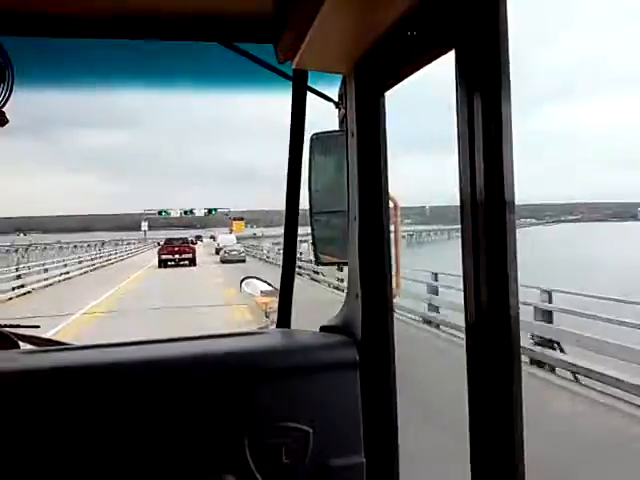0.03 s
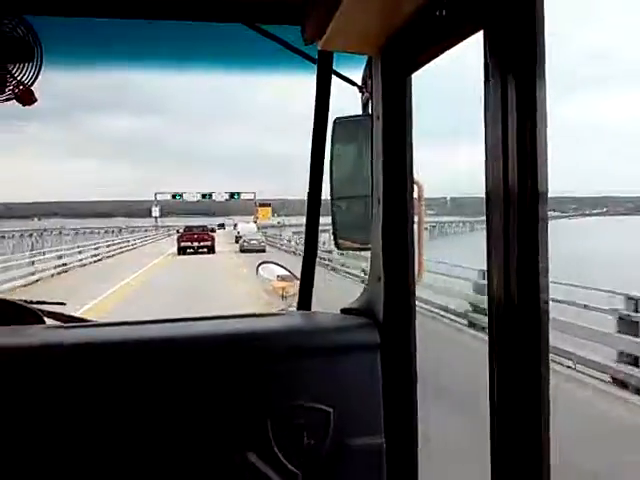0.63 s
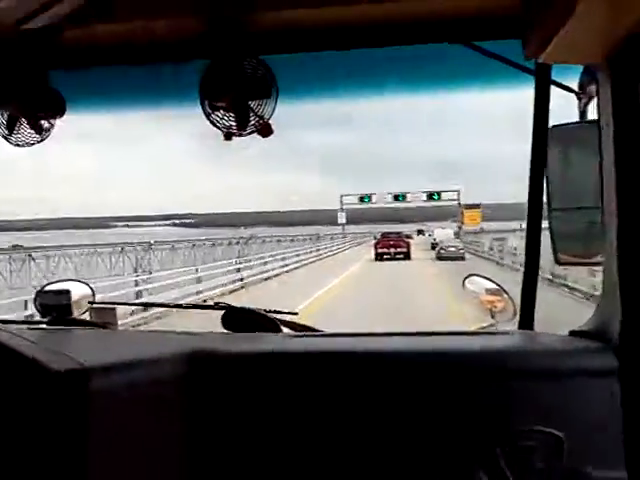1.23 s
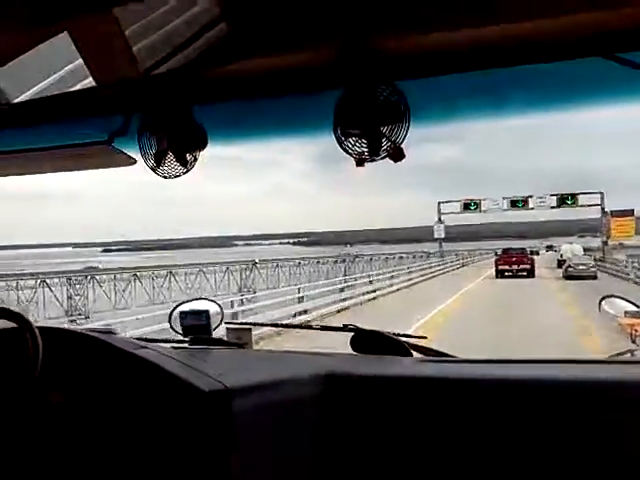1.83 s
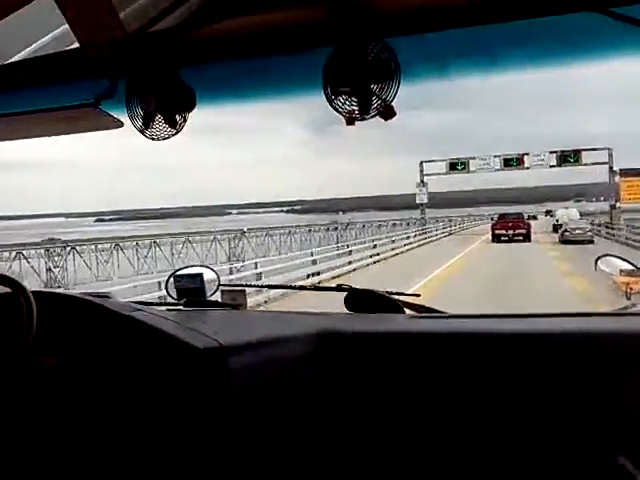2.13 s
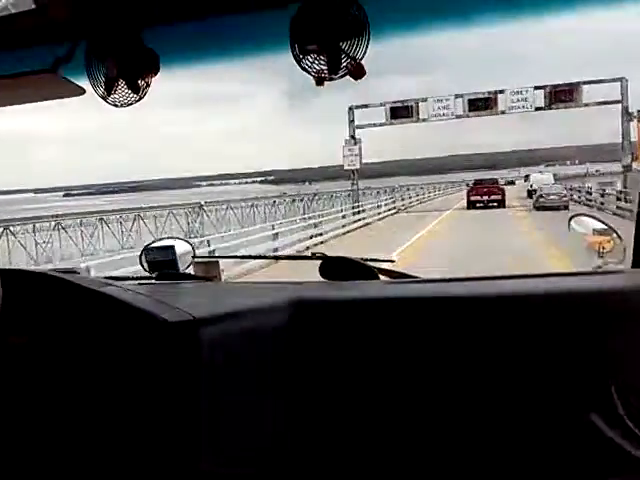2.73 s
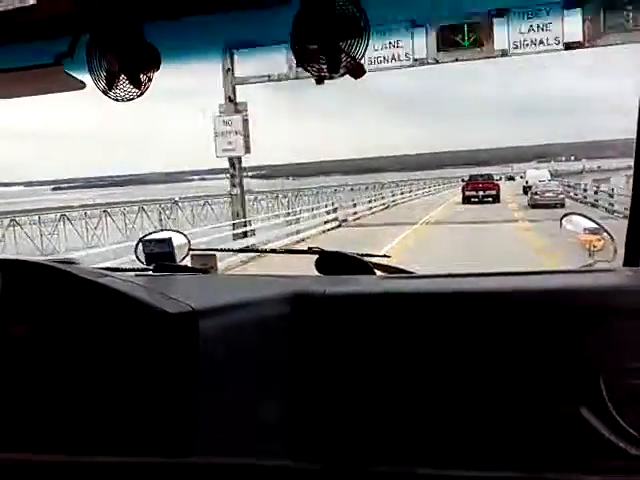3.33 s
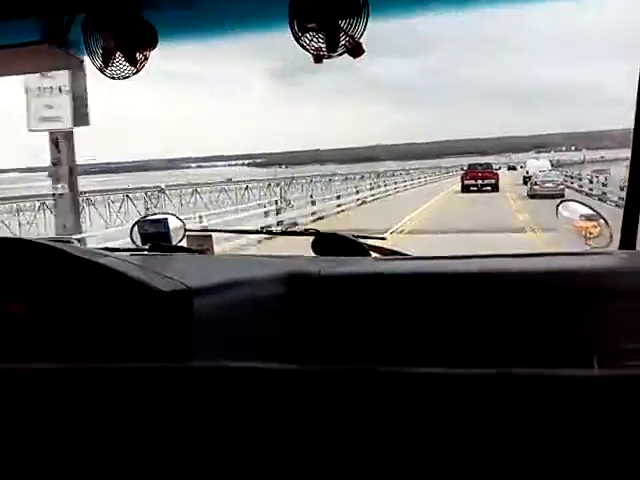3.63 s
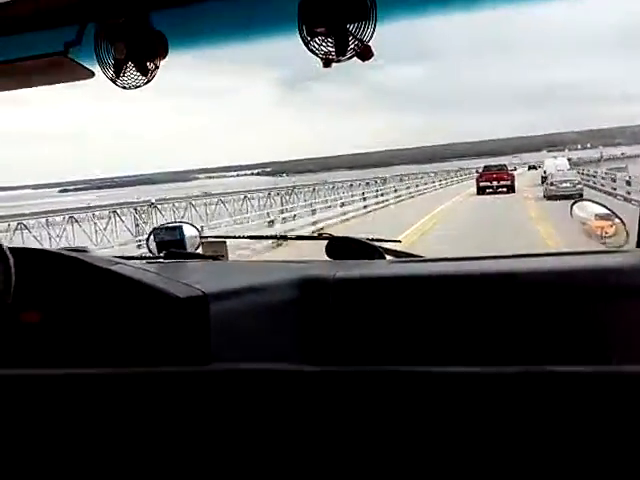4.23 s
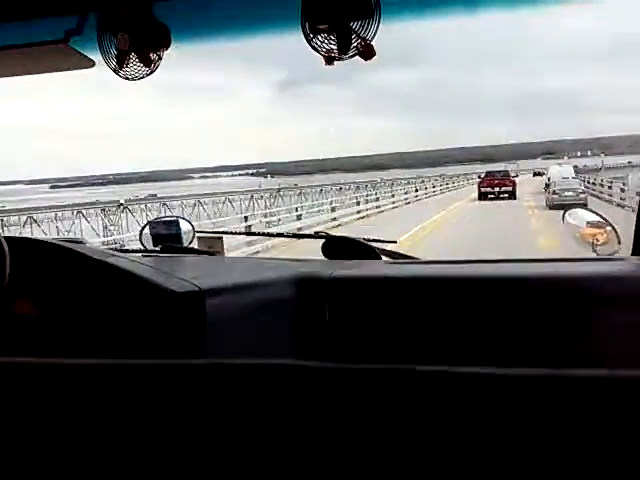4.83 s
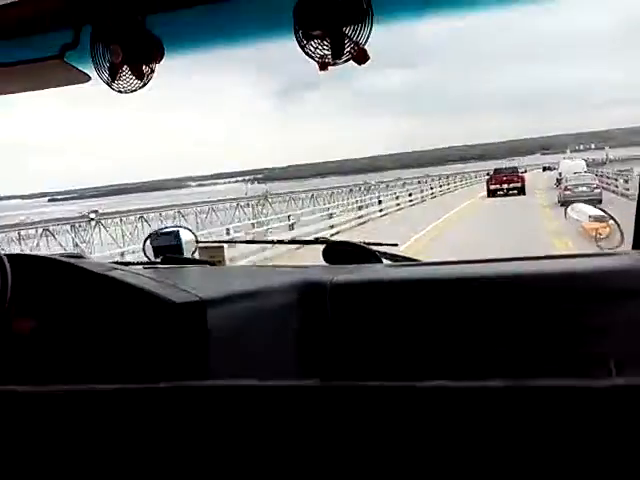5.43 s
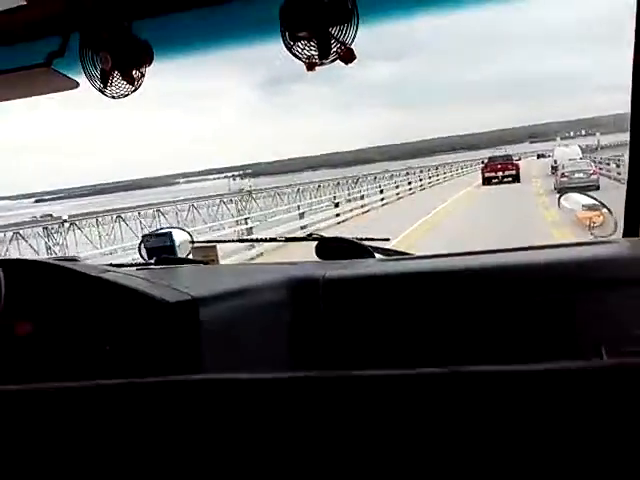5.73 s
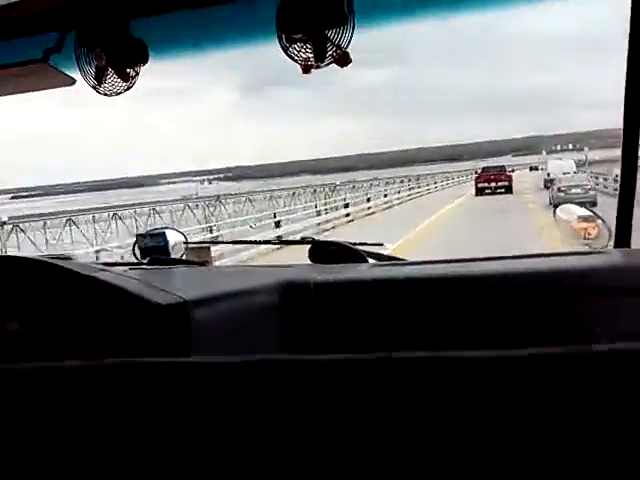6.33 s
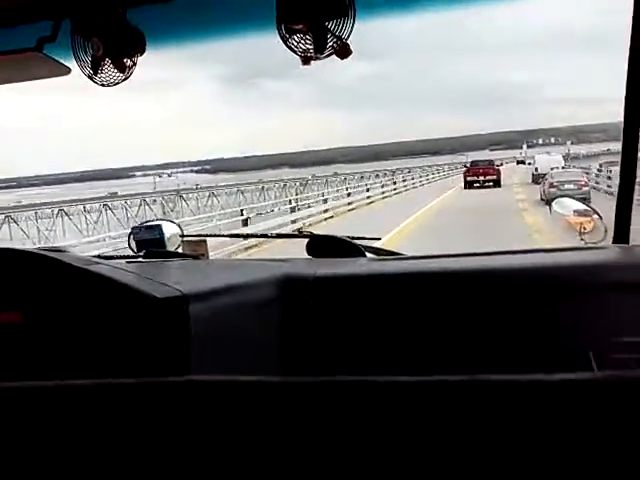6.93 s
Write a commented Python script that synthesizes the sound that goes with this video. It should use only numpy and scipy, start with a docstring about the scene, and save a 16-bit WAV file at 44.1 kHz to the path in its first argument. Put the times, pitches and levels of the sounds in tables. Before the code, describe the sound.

Inside a driving bus, tyres roar and fittings rattle while gusts of wind thump and overload the microphone.

```python
"""The front of a bus driving over a bridge, with wind beating in at a window.
From the start, road roar and a draught fill the cab, with rattling metal, brief squeaks and clacks.
Buffets of air, fierce around 1 s, drive the microphone into saturation: the sound cuts out for
instants, each framed by two low thumps. The wind eases near 2 s, then returns in repeated gusts.
Near 7 s comes a short, bright hiss of air."""
import sys
import numpy as np
from scipy import signal
from scipy.fft import rfft, irfft
from scipy.io import wavfile
from scipy.ndimage import uniform_filter1d

SR = 44100
rng = np.random.default_rng(int(sys.argv[2]) if len(sys.argv) > 2 else 0)


def master(y):
    """Save y as 16-bit WAV."""
    cut = np.clip(np.atleast_2d(y).T, -1, 1)
    pcm = np.round(cut * 32767)  # scale
    wavfile.write(sys.argv[1], SR, pcm.astype(np.int16))


N = 317520
TIME = np.arange(N) / SR
LIMIT = 6.4  # pressure at which the microphone saturates

# Gusts that rock the cabin air: (first crest [s], half swings [count], frequency [Hz],
# share of each half swing at the limit [0-1], first direction [push/pull])
OSCILLATIONS = [(0.19, 2, 27.2, 0.6, "pull"), (0.349, 2, 26.2, 0.7, "push"), (0.793, 2, 36, 0.69, "pull"),
                (0.868, 4, 16.3, 0.72, "push"), (1.072, 3, 12.6, 0.79, "pull"),
                (1.18, 3, 17.7, 0.77, "push"), (2.281, 2, 15.7, 0.4, "push"),
                (2.419, 3, 17.1, 0.42, "pull"), (2.815, 3, 20.5, 0.49, "pull"),
                (3.001, 2, 18.6, 0.44, "push"), (3.142, 2, 20, 0.82, "push"), (3.222, 2, 22, 0.7, "push"),
                (3.289, 2, 24, .48, "push"), (3.412, 2, 25.4, .67, "pull"), (3.492, 2, 18.2, 0.49, "pull"),
                (3.562, 2, 22.8, 0.626, "pull"), (3.689, 3, 25.4, 0.56, "pull"),
                (4.153, 2, 14.8, 0.55, "push"), (4.333, 2, 23.9, 0.57, "push"),
                (4.492, 2, 24.4, 0.69, "pull"), (4.549, 2, 24.3, 0.71, "pull"),
                (4.63, 3, 23.2, 0.77, "pull"), (4.776, 3, 23, 0.76, "push"), (4.859, 2, 17.5, 0.4, "pull"),
                (4.997, 2, 14.8, 0.78, "pull"), (5.218, 3, 11.7, 0.5, "push"),
                (5.448, 2, 24.7, 0.64, "pull"), (5.848, 5, 14.1, 0.74, "pull"),
                (6.149, 2, 16.3, .66, "push"), (6.313, 4, 15.3, 0.71, "push"),
                (6.456, 6, 14.2, 0.78, "push"), (6.758, 4, 18.2, 0.63, "push"),
                (6.904, 2, 12.9, 0.94, "push")]
# Single slaps of wind: (crest [s], time at the limit [s], direction [push/pull])
PULSES = [(.007, 0.014, "pull"), (.116, 0.015, "push"), (0.482, 0.0097, "push"), (.736, 0.01, "push"),
          (.848, 0.0083, "pull"), (1.009, 0.018, "push"), (1.361, 0.014, "pull"), (1.662, 0.013, "pull"),
          (2.171, 0.0078, "pull"), (2.686, 0.012, "push"), (2.774, 0.0096, "push"), (3.383, 0.0074, "push"),
          (3.828, 0.013, "push"), (3.922, 0.0094, "pull"), (3.994, 0.0093, "push"), (4.731, 0.0144, "push"),
          (5.07, 0.012, "push"), (5.13, 0.024, "pull"), (5.586, 0.016, "push"), (5.724, 0.013, "pull"),
          (5.777, 0.012, "push"), (6.072, 0.028, "push"), (6.108, 0.047, "pull"), (7.136, .012, "push")]
# Sign and size of a pulse: (direction [push/pull], pressure factor [ratio])
POLARITY = {"push": 1, "pull": -1.066}
def buffets(excess_db, puffs_per_s=2.5, puff_s=.007, steepening=.36, edge_spread_db=1.5):
    """Superposition: gusts, slaps and chance puffs add as pulses, steeper in stronger wind."""
    pulses = []
    for s, count, hz, share, first in OSCILLATIONS:
        for k in range(round(count)):
            steeper = 1.043 if k else 1
            pulses.append((s + k / (2 * hz), share / (2 * hz), POLARITY[first] * (-1) ** k, steeper))
    pulses += [(s, held, POLARITY[direction], 1) for s, held, direction in PULSES]
    crests = np.array([pulse[0] for pulse in pulses])
    for place, chance, length, side in rng.random((80, 4)):
        s = place * TIME[-1]
        between_gusts = abs(crests - s).min() > .03
        if between_gusts and chance < puffs_per_s * TIME[-1] / 80:
            pulses.append((s, puff_s * (.5 + length), np.sign(side - .5), 1))
    pressure = np.zeros(N)
    for (s, held, sign, steeper), luck in zip(pulses, rng.standard_normal(size=300)):
        edge_db = steepening * excess_db[int(s * SR)] + edge_spread_db * luck
        start, shape = pressure_pulse(s, held, steeper * gain_of(edge_db))
        add(pressure, start, sign * shape)
    return pressure


def pressure_pulse(crest, held, steepness, rise_s=.008, ebb_s=.0075):
    """Overload: one buffet swells past the limit (here 1) and ebbs; returns its start and shape."""
    t = np.arange(max(-.08, -crest), .08, 1 / SR)
    depth = steepness * np.minimum((held / 2 + t) / rise_s, (held / 2 - t) / ebb_s)
    return crest + t[0], 1 + np.tanh(depth)


# Strength of the turbulence at the window: (time [s], level [dB])
TURBULENCE_LEVEL = [(0, -13.5), (.32, -14.5), (.58, -22.5), (.85, -10.5), (1.15, -6.5), (1.54, -22),
                    (1.94, -16.5), (2.04, -28), (2.3, -22), (2.55, -24.5), (3.39, -15), (4.27, -20.5),
                    (4.88, -10), (5.03, -21), (5.35, -26), (5.73, -14.5), (7.08, -16.5), (7.2, -18.5)]
# Spectra of the air's slow sway, its eddies and its hollow boom: (frequency [Hz], level [dB])
SWAY_SPECTRUM = [(6, -26), (14, -5), (24, -0.5), (40, 3), (60, -19), (85, -11), (120, -25.5), (200, -40.5),
                 (400, -92)]
EDDY_SPECTRUM = [(40, 2.5), (90, 5), (140, 1), (200, -2), (300, -7), (450, -14.5), (700, -15), (1500, -41),
                 (3000, -35), (5000, -58.5), (16000, -83)]
BOOM_SPECTRUM = [(60, -26), (120, -2.5), (160, 6), (210, 3), (270, -7), (450, -34.5)]
def wind(sway_db=1.5, boom_db=-25.5, stir_db=3, lumpy_db=3.15):
    """Turbulence: each buffet overrides the sway of the cabin air and stirs up eddies and a boom."""
    turbulence_db = along(TURBULENCE_LEVEL)
    excess_db = turbulence_db - turbulence_db.mean()
    pulses = buffets(excess_db)
    calm = 1 - np.minimum(abs(pulses), 1)
    stirred = uniform_filter1d(1 - calm, size=2600)
    sway = noise(SWAY_SPECTRUM) * gain_of(sway_db + .34 * excess_db)
    eddies = noise(EDDY_SPECTRUM) * gain_of(turbulence_db)
    boom = noise(BOOM_SPECTRUM) * gain_of(boom_db + 1.03 * excess_db)
    agitation = gain_of(stir_db * stirred + lumpy_db * flutter(60))
    return LIMIT * pulses + calm * sway + (eddies + boom) * agitation


# Spectrum of the roar in the cab: (frequency [Hz], level [dB])
ROAD_SPECTRUM = [(150, 4), (350, -11.5), (490, 2), (680, -6), (900, 1), (1120, -2), (1350, 0.5),
                 (1600, 0.5), (1900, 0.5), (2500, -11.5), (3300, -16.5), (4600, -31.5), (6300, -30.5),
                 (9500, -41.5), (16000, -45)]
# Strength of the roar: (time [s], level [dB])
ROAD_LEVEL = [(0.0, -21.5), (0.82, -22.5), (1.4, -17.5), (1.56, -27), (1.84, -19.5), (2.14, -25.5),
              (2.73, -22.5), (3.15, -24.5), (4.15, -19), (4.33, -25), (4.61, -28), (4.71, -21.5),
              (5.47, -29.5), (5.59, -21.5), (6.45, -25), (6.53, -24.5), (7.1, -18), (7.2, -29)]
def road(grit_db=1.5, lump_db=3.5, surge_db=1):
    """Amplitude modulation: the noise of tyres and rushing air wavers on three time scales."""
    unevenness_db = grit_db * flutter(220) + lump_db * flutter(50) + surge_db * flutter(12)
    return noise(ROAD_SPECTRUM) * gain_of(along(ROAD_LEVEL) + unevenness_db)


# Resonances of a narrow gap: (frequency [Hz], width parameter [Hz], level [dB])
GAP_RESONANCES = [(950, 660, -5), (1192, 410, 1), (1372, 90, 3.5), (1510, 45, 2)]
# Strength of the draught: (time [s], level [dB])
DRAUGHT_LEVEL = [(0, -28.5), (0.7, -22.5), (1.05, -47), (1.45, -24), (2.2, -23), (2.8, -22.5), (3.3, -25.5),
                 (3.8, -33.5), (5, -23.5), (5.6, -35.5), (7.2, -24)]
def draught():
    """Resonance: air through a narrow gap sings in a few bands of noise."""
    hz = np.geomspace(200, 12000, 400)
    power = sum(gain_of(db) ** 2 / (1 + (2 * (hz - centre) / width) ** 2) ** 4.4
                for centre, width, db in GAP_RESONANCES)
    return noise(np.c_[hz, 10 * np.log10(power)]) * gain_of(along(DRAUGHT_LEVEL))


# How hard the fittings shake: (time [s], level [dB])
RATTLE_LEVEL = [(0.0, -23), (0.18, -58), (0.3, -29.5), (0.54, -47), (1.3, -28.5), (1.5, -41), (1.92, -32),
                (2.12, -44), (3.59, -35.5), (3.73, -42), (3.85, -30.5), (4.63, -38.5), (4.83, -31.5),
                (5.43, -41.5), (5.69, -32.5), (6.86, -35.5), (6.94, -32.5), (7.2, -29.9)]
# Spectrum of metal striking metal: (frequency [Hz], level [dB])
CONTACT_SPECTRUM = [(500, -63), (1800, -7), (2600, -4), (3600, -2), (4700, -13), (5300, -12), (5700, -5.5),
                    (6500, -2.5), (7300, -10.5), (8600, -10), (9600, -5), (11500, -15.5), (13300, -14),
                    (16000, -31)]
# The hardest knocks: (time [s], level [dB], decay time [s])
HARD_KNOCKS = [(1.024, -15, .0023), (1.224, -8, .003), (1.303, -15, .0022), (1.826, -18, .003),
               (1.91, -17, .003), (2.709, -15, .0025), (3.275, -10, .003), (3.525, -17, .002),
               (3.543, -12, .003), (3.838, -13, .0025), (3.927, -18, .002), (4.079, -17, .0022),
               (4.244, -17, .0025), (5.678, -17, .0025), (5.703, -16, .002), (5.79, -16, .002),
               (6.263, -17, .0025), (6.991, -12, .003), (7.144, -18, .0025)]
# Modes of the fittings: (frequency [Hz], level [dB], time to fall 60 dB [s])
METAL_MODES = [(5368, -7, .25), (6309, 0, .19), (7149, -9, .2), (8010, -6, .4), (9902, -5, .15),
               (12152, -12, .3), (13287, -10, .2)]
def fittings(ticks_per_s=160, taps_per_s=12, clump_db=2.9, bright_hz=4500, ring_db=-51):
    """Impact excitation: loose metal chatters, taps and knocks, and each contact rings its modes."""
    t = np.arange(SR // 3) / SR
    rattle_db = along(RATTLE_LEVEL)
    force = np.minimum(rng.exponential(1, N), 3)
    ticks = (rng.random(N) < ticks_per_s / SR) * gain_of(2 * force + clump_db * flutter(25))
    tick_decay = np.exp(-t / .0029) + .027 * np.exp(-t / .079)
    chatter = evened(signal.oaconvolve(ticks, tick_decay)[:N])
    tap_impulses = (rng.random(N) < taps_per_s / SR) * gain_of(rattle_db + 3 * force)
    taps = signal.oaconvolve(tap_impulses, knock(db=5.5, decay_s=.0017))[:N]
    knocks = np.zeros(N)
    for s, db, decay_s in HARD_KNOCKS:
        add(knocks, s, knock(db, decay_s))
    # hard knocks are brighter than the light chatter
    high_pass = signal.butter(1, bright_hz, "high", fs=SR)
    bright = evened(signal.lfilter(*high_pass, noise(CONTACT_SPECTRUM)))
    contact = (chatter * gain_of(rattle_db) + taps) * noise(CONTACT_SPECTRUM) + knocks * bright
    ring = sum(gain_of(db - 60 * t / t60) * np.cos(2 * np.pi * hz * t) for hz, db, t60 in METAL_MODES)
    return contact + gain_of(ring_db) * signal.oaconvolve(contact, ring)[:N]


def knock(db, decay_s):
    """Exponential decay: the envelope of one contact, a sharp crack and a short tail."""
    t = np.arange(SR // 8) / SR
    return gain_of(db) * (np.exp(-t / decay_s) + .1 * np.exp(-t / .016))


# Brief squeaks, whistles, clacks and low thuds:
# (time [s], duration [s], pitch [Hz], level [dB], roughness [ratio])
SQUEAKS_AND_CLACKS = [(.013, 0.012, 1630, -13.5, 0.4), (.128, 0.022, 1683, -18.5, 0.9),
                      (.768, 0.0074, 617, -6.5, 0.5), (.831, 0.011, 1660, -17.5, 1),
                      (.981, 0.018, 1503, -14.5, 0.98), (1.905, 0.025, 333, -17.5, 0.65),
                      (2.793, .01, 2170, -20, 0.9), (4.167, .015, 2000, -16, 0.83),
                      (4.692, 0.0091, 2050, -15, 0.26), (4.711, 0.025, 2080, -12, 0.8),
                      (4.757, 0.0081, 740, -15, 1), (4.841, .008, 2630, -16, 1.2),
                      (5.928, 0.012, 1670, -13, 0.75), (6.39, 0.0113, 1955, -18.5, 1.1),
                      (7.018, 0.037, 303, -13.5, 0.54), (7.103, 0.017, 1680, -9.5, 0)]
def squeaks_and_clacks():
    """Random modulation: short tones, clean or roughened by jitter in pitch and strength."""
    out = np.zeros(N)
    pitch_jitter, strength_jitter = .25 * flutter(1200), flutter(900)
    for s, length, hz, db, rough in SQUEAKS_AND_CLACKS:
        span = slice(int(s * SR), int((s + length) * SR))
        turns = np.cumsum(hz * (1 + rough * pitch_jitter[span])) / SR
        tone = evened((1 + rough * strength_jitter[span]) * np.sin(2 * np.pi * turns))
        add(out, s, gain_of(db) * signal.windows.tukey(len(tone), .6) * tone)
    return out


# Envelope of a spurt of air: (time [s], level [dB])
HISS_LEVEL = [(6.94, -70), (6.962, -26), (6.99, -22), (7.015, -25), (7.04, -36), (7.1, -70)]
# Its spectrum: (frequency [Hz], level [dB])
HISS_SPECTRUM = [(2060, -40), (3500, -21), (4410, -24), (4960, -31), (5340, -1), (6650, -2), (7670, -5),
                 (8630, -8), (9540, -8), (10200, -8), (10400, -12), (12900, -7), (15500, -21)]
def spurt():
    """Flow noise: a short spurt of air makes a bright hiss."""
    return noise(HISS_SPECTRUM) * gain_of(along(HISS_LEVEL))


def noise(spectrum):
    """Spectral shaping: white noise takes on a (frequency [Hz], level [dB]) curve, at rms 1."""
    hz, db = np.transpose(spectrum)
    bins = np.fft.rfftfreq(N, 1 / SR)
    response = gain_of(np.interp(np.log(bins + 1), np.log(hz), db))
    return evened(irfft(rfft(rng.standard_normal(N)) * response, N))


def flutter(rate_hz):
    """Low-pass filtering: a smooth random fluctuation up to about rate_hz, at rms 1."""
    bins = np.fft.rfftfreq(N, 1 / SR)
    return evened(irfft(rfft(rng.standard_normal(N)) * np.exp(-(bins / rate_hz) ** 2), N))


def along(points):
    """Linear interpolation of (time [s], value) points at every sample."""
    return np.interp(TIME, *np.transpose(points))


def gain_of(db):
    """Conversion of decibels to amplitude."""
    return 10 ** (np.asarray(db) / 20)


def evened(x):
    """Normalisation to rms 1."""
    return x / np.sqrt(np.mean(x ** 2) + 1e-20)


def add(mix, s, sound):
    """Superposition of a sound on the mix at time s."""
    part = mix[max(round(s * SR), 0):][:len(sound)]
    part += sound[:len(part)]


def scene():
    """Superposition: the pressures of cab and wind add at the microphone."""
    cab = road() + draught() + fittings() + squeaks_and_clacks() + spurt()
    return (wind() + cab)[None]


def saturate(x, knee):
    """Soft clipping: small values pass, large ones flatten at +-1; a higher knee is harder."""
    return x / (1 + abs(x) ** knee) ** (1 / knee)


def record(dry, cut_hz=98, damping=1.634, notch_hz=4120, rumble_db=-35, top_hz=15900):
    """Saturation: the pinned microphone cuts the sound out; its bass cut makes each edge a thump."""
    pinned = LIMIT * saturate(dry[0] / LIMIT, knee=50)
    omega = 2 * np.pi * cut_hz
    leak = .018  # share of steady pressure that passes the bass cut, inverted
    bass_cut = signal.bilinear([1, 0, -leak * omega ** 2], [1, damping * omega, omega ** 2], SR)
    settled = signal.lfilter_zi(*bass_cut) * pinned[0]
    out = signal.lfilter(*bass_cut, pinned, zi=settled)[0]
    # a narrow dip in the response rings on briefly when the sound is cut
    out = signal.lfilter(*signal.iirnotch(notch_hz, Q=26, fs=SR), out)
    # a faint low rumble carries on through the dropouts
    rumble = noise([(20, -10), (90, 0), (200, -4), (400, -25), (900, -38), (3000, -50), (9000, -70)])
    out += gain_of(rumble_db) * rumble
    out = np.clip(1.04 * saturate(out, knee=4), -1, 1)  # the output stage clips
    low_pass = signal.firwin(511, top_hz, window=("kaiser", 9), fs=SR)
    return signal.oaconvolve(out, low_pass, "same")[None]


dry = scene()
out = record(dry)
master(out)
```